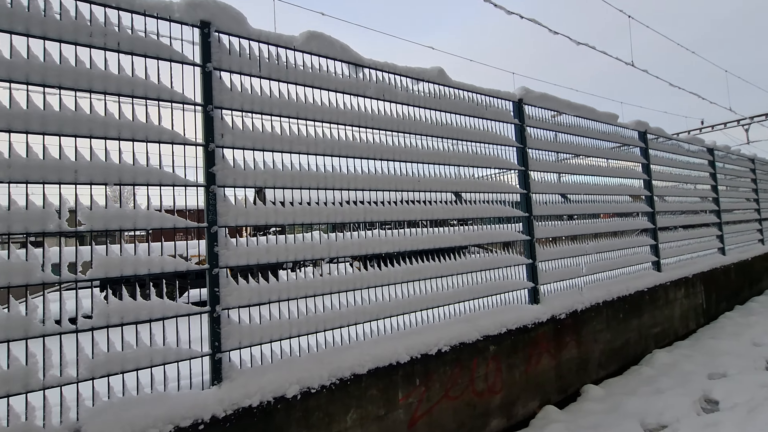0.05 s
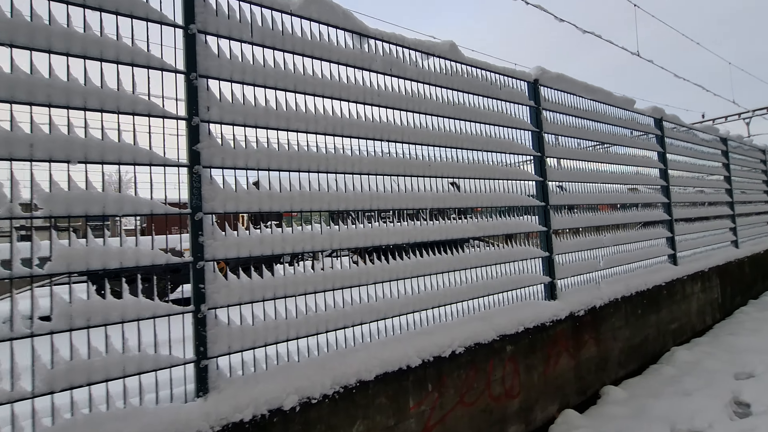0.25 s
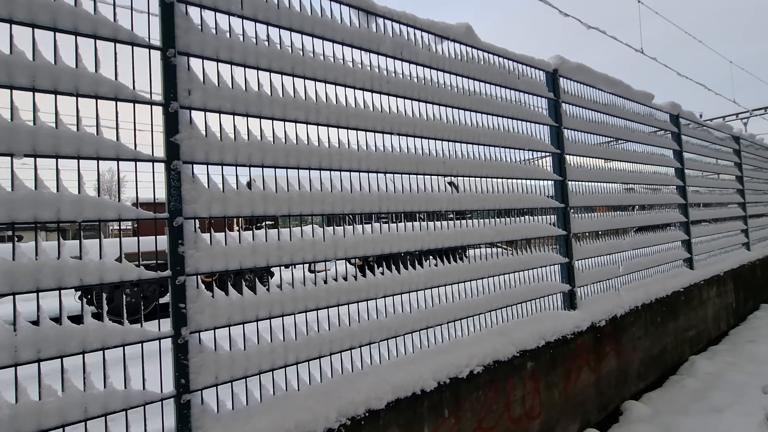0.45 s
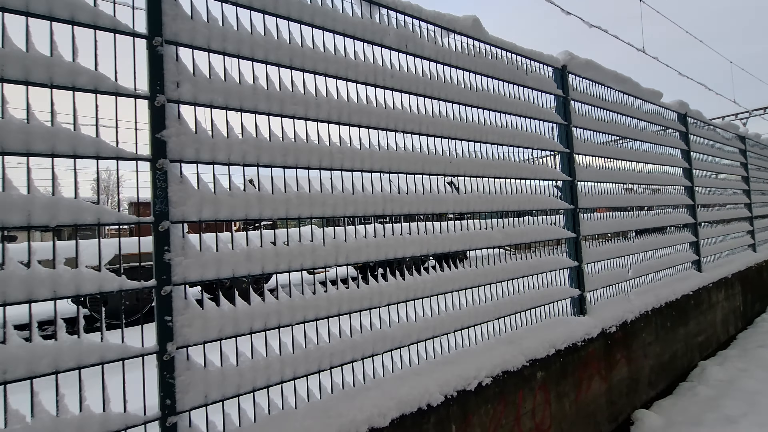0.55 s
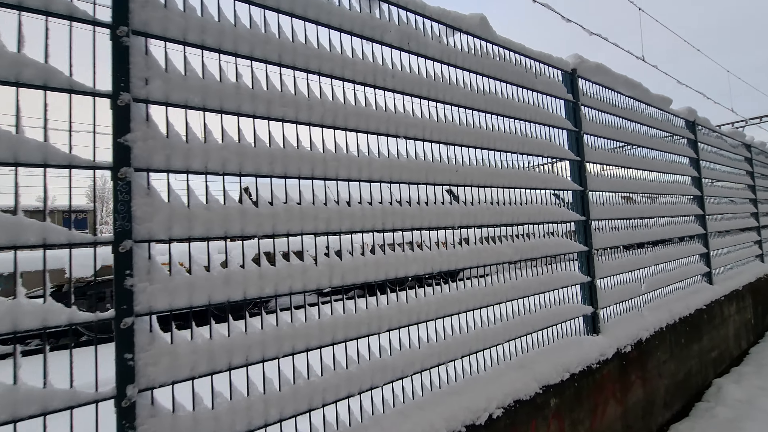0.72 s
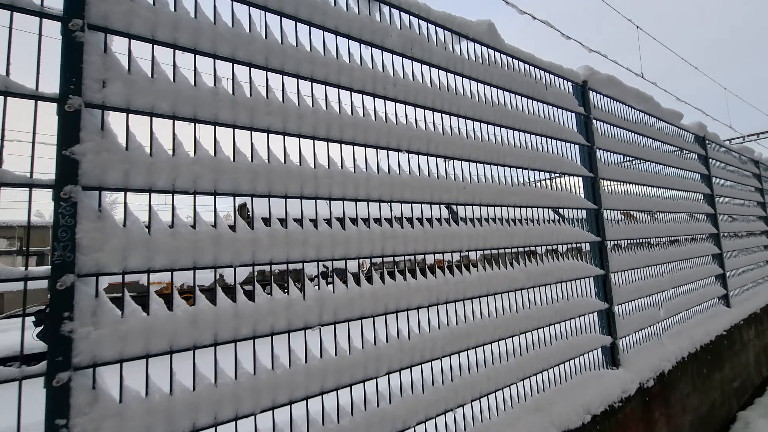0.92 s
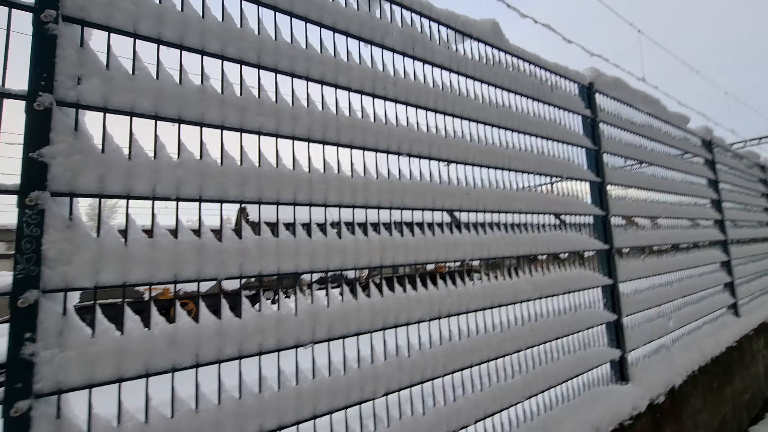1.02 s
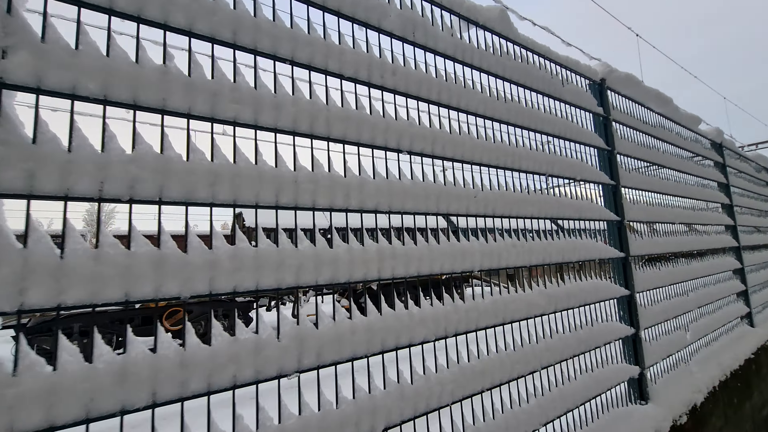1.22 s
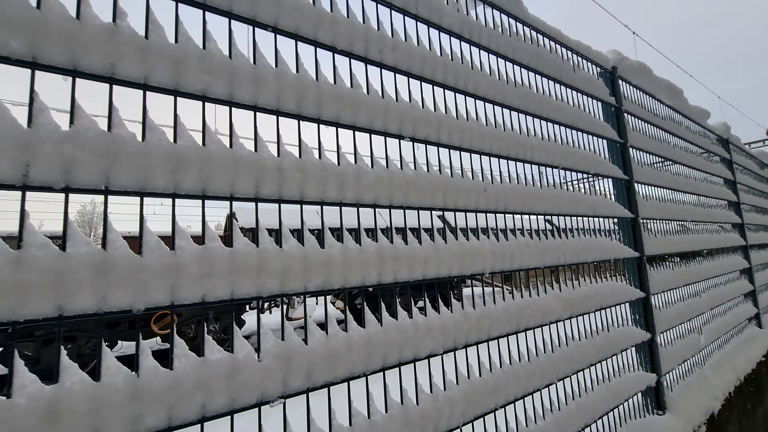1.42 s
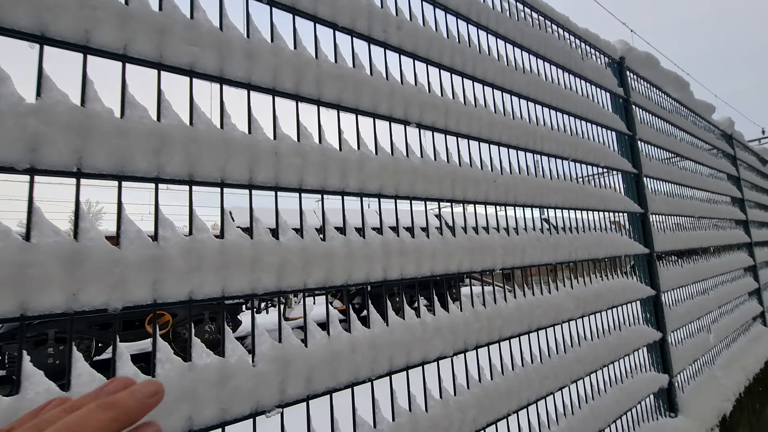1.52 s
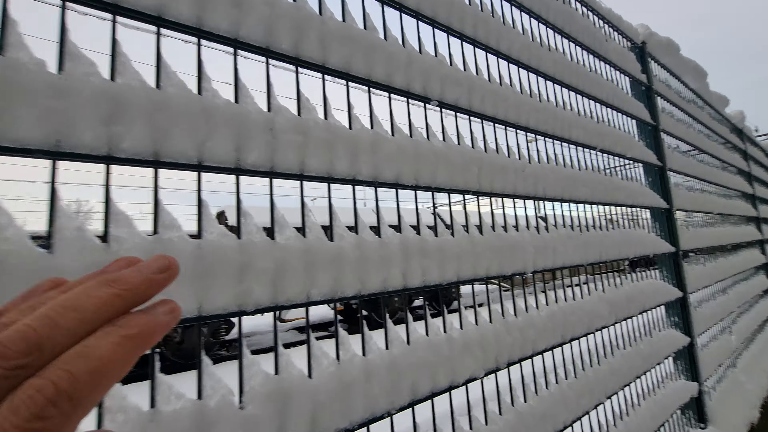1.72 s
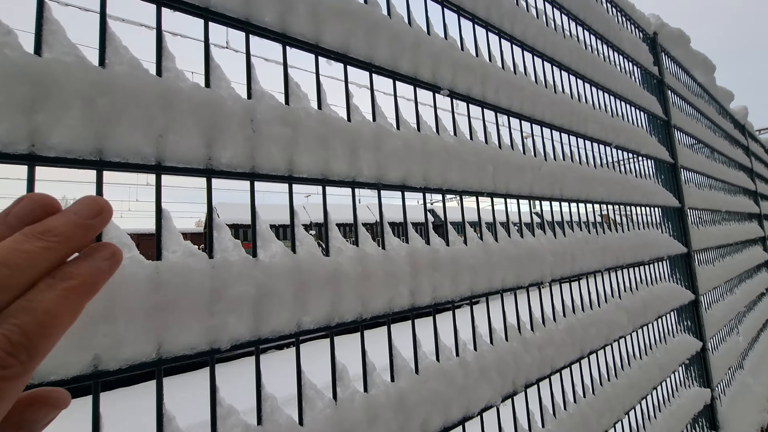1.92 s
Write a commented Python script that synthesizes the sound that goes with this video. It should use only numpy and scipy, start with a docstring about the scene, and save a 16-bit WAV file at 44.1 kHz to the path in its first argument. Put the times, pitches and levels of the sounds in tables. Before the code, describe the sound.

Slow footsteps pack snow in short, dull crunches outdoors beside a fence. First, wind buffets the microphone and a jacket swishes with a sharp double click; the crunches follow, with small dry ticks and faint distant traffic.

```python
"""Slow footsteps in snow beside a fence: it packs under the boots in short, dull crunches.
Close in, wind buffets the two microphone ports, and a jacket swishes, with one sharp
double click, as an arm is raised. Crust and cloth give small dry ticks.
Far behind lie a wash of traffic and a faint hum."""
import sys
import numpy as np
from scipy import signal
from scipy.fft import rfft, irfft
from scipy.io import wavfile
from scipy.ndimage import uniform_filter1d

SR = 44100
rng = np.random.default_rng(int(sys.argv[2]) if len(sys.argv) > 2 else 0)


def output_pcm(signal):
    """Save a mono or channel-first signal as 16-bit PCM at the path in sys.argv[1].

    Samples are clipped to [-1, 1] before scaling.
    """
    pcm = np.clip(np.atleast_2d(signal).T, -1, 1) * 32767
    wavfile.write(sys.argv[1], SR, np.round(pcm).astype(np.int16))


N = 85995
T = np.arange(N) / SR
HZ = np.maximum(np.arange(N // 2 + 1) * SR / N, 1)


def footsteps(snow_q=3.6, grain_s=0.00057):
    """Snow packs underfoot in jerks: each run of slips rings a dull body and sheds grit."""
    # Snow giving way. Each row: start and length in seconds, level in dB, body in Hz, grit in dB re body.
    crunches = [(0.653, 0.011, -51.5, 277, -4), (0.688, 0.015, -49.5, 470, -8),
                (.738, .014, -43.5, 457, -15), (.82, 0.014, -40.5, 209, -39), (.817, 0.011, -42, 442, -16),
                (.868, .014, -56, 387, -9), (0.898, 0.02, -46.5, 210, -18), (.911, .008, -44.5, 527, -8.5),
                (.963, 0.021, -38, 232, -8.5), (1.039, .007, -39, 350, -14), (1.067, 0.013, -42, 215, -10),
                (1.183, .016, -44, 186, -21), (1.321, .012, -48.5, 385, -13), (1.458, 0.011, -54, 600, 16),
                (1.498, 0.011, -47, 380, -13), (1.577, .009, -36.5, 395, -8.5),
                (1.608, .011, -43, 425, -1.5), (1.625, 0.04, -49, 235, 1), (1.683, 0.013, -45, 292, -19)]
    # Spectrum of the grit. Each row: frequency in Hz, gain in dB.
    grit_colour = [(150, -20), (450, 2), (700, 8), (1100, 12), (1600, 0), (2300, -21), (4000, -32),
                   (9000, -43)]
    out = 0
    for at, length, db, hz, grit_db in crunches:
        jerks = slips(at, length)
        body = unit(ring(ring(jerks, hz, snow_q), hz, q=0.59))
        grains = signal.lfilter([1], [1, -np.exp(-1 / (grain_s * SR))], abs(jerks))
        grit = ports(lambda: unit(colour(grains * noise(), grit_colour)))
        out = out + burst_level(body + undb(grit_db) * grit, db, length)
    return out * pan(db=.8)


def slips(start, length, per_s=450, scatter_db=3):
    """An uneven run of tiny collapses in packed snow, one impulse each."""
    count = int(np.clip(length * per_s, 2, 64))
    jitter, strength = rng.standard_normal((64, 2))[:count].T
    signs = rng.choice([-1, 1], 64)[:count]
    times = start + length * (np.arange(count) + .5 + .35 * jitter) / count
    out = np.zeros(N)
    np.add.at(out, np.clip((times * SR).astype(int), 0, N - 1), undb(scatter_db * strength) * signs)
    return out


def wind(wander=.21, flutter_ratio=1.8, flutter_db=-11, sway_hz=48.5, sway_db=-20):
    """Eddies rock the air right at the ports: a few uneven swings, a quicker flutter and a slow sway."""
    # Buffets. Each row: middle and length in seconds, level in dB as if held for a quarter
    # of that length, centre in Hz, left minus right in dB.
    buffets = [(0.107, 0.069, -47, 65, 8), (0.243, 0.054, -35, 71.3, 21), (0.266, 0.082, -36.5, 135, -33),
               (.297, 0.076, -41, 72, -24), (0.338, 0.089, -36, 65.3, 14), (.362, 0.051, -28, 115, -22),
               (0.4, 0.024, -31.5, 89.1, -11), (0.42, 0.033, -21, 112, -36), (0.448, .018, -25, 170, -40),
               (.472, 0.035, -22.5, 87.46, -41), (0.497, 0.048, -31, 115, -18),
               (0.539, 0.048, -37.5, 63.86, 15), (0.606, 0.044, -43, 59.1, 15),
               (0.696, 0.029, -38.5, 64.7, 19.5), (0.779, 0.033, -39, 58, 17), (0.904, 0.052, -39.5, 70, 8),
               (1.098, 0.11, -43.5, 58, -1), (1.495, .07, -51, 58.4, 3), (1.613, 0.046, -41, 80, -7),
               (1.878, 0.025, -42, 55.5, 1)]
    out = 0
    for at, length, db, hz, side_db in buffets:
        swell = np.cos(np.pi * np.clip((T - at) / length, -.5, .5))
        swing_hz = hz * np.exp(wander * drift(rate=327))
        push = unit(np.sin(2 * np.pi * (np.cumsum(swing_hz) / SR + rng.random())))
        flutter = unit(ring_twice(noise(), flutter_ratio * hz, q=1.53))
        sway = unit(ring_twice(noise(), sway_hz, q=1))
        eddy = (push + undb(flutter_db) * flutter + undb(sway_db) * sway) * swell
        out = out + burst_level(eddy, db, length / 4) * pan(side_db)
    return out


def jacket(grain_db=.75, right_db=1):
    """Sliding cloth gives a grainy hiss, brighter on the left, and one rub close to the microphone."""
    # Course of the swishes and of the rub. Each row: time in seconds, level in dB.
    swish_level = [(0, -57), (.06, -84), (.085, -58), (.145, -56), (.18, -59.5), (.28, -56), (.385, -54.5),
                   (.44, -61), (.58, -65.5), (.7, -54), (.8, -58.5), (.96, -57), (1.04, -56), (1.11, -64.5),
                   (1.2, -58.5), (1.3, -53), (1.52, -53), (1.62, -57), (1.78, -64), (1.82, -60),
                   (1.95, -73)]
    rub_level = [(.2, -68), (.28, -41), (.32, -46.5), (.385, -37.5), (.41, -45.5), (.44, -47), (.5, -87)]
    # Spectra of the swish on each side and of the rub. Each row: frequency in Hz, gain in dB.
    left_colour = [(400, 12), (1200, -3.5), (2400, 8.5), (4500, -1), (6500, -2.5), (9000, 0), (13000, 0.5),
                   (16000, -7)]
    right_colour = [(400, -2), (1400, 1.5), (2400, -12.5), (3300, -15.5), (4500, -14), (6500, -20.5),
                    (10000, -20), (12500, -14), (16000, -21)]
    rub_colour = [(200, 26), (600, 11), (1100, 9), (1700, 10.5), (2600, 1), (4500, -2.5), (8000, -9.5),
                  (16000, -29)]
    grain = undb(grain_db * drift(rate=120))
    left, right = ports(lambda: noise() * grain)
    swish = np.array([unit(colour(left, left_colour)), undb(right_db) * unit(colour(right, right_colour))])
    rub = ports(lambda: unit(colour(noise() * grain, rub_colour)))
    return swish * curve(swish_level) + rub * curve(rub_level)


def clicks(crack_db=3):
    """Hard contacts close by, perhaps jacket fittings: each a sharp crack, then a short scatter."""
    # Contacts, the loudest two a double click. Each row: start in seconds, level in dB, decay in seconds.
    contacts = [(0.025, -60, 0.0032), (0.137, -59, 0.0058), (.207, -56, .002), (.588, -56, 0.0014),
                (.393, -34, .0008), (0.394, -28.5, .0008), (0.395, -48, 0.011)]
    # Their bright spectrum. Each row: frequency in Hz, gain in dB.
    click_colour = [(800, -23), (1600, 7.5), (2600, -24), (4700, -8), (5250, 2), (6000, -9), (6900, -0.5),
                    (8000, -3), (9500, -5), (10500, -15.5), (16000, -11.5)]
    out = 0
    for at, db, decay in contacts:
        impulse = np.diff((T >= at).astype(float), prepend=0)
        crack = unit(stereo(impulse, np.zeros(N)))
        scatter = ports(lambda: unit(noise() * fade(at, decay)))
        contact = scatter + undb(crack_db) * np.exp(-decay / .005) * crack  # long ones mostly rustle
        out = out + burst_level(colour(contact, click_colour), db, decay)
    return out * pan(db=-5)


def ticks():
    """Crust and cloth tick faintly nearby: dry, fast-dying bursts of midrange noise."""
    # Ticks. Each row: start in seconds, level in dB, centre in Hz, decay in seconds.
    bursts = [(.076, -52, 1360, 0.012), (0.136, -47, 1370, 0.0048), (0.589, -52, 1410, 0.0018),
              (.966, -46.5, 1130, 0.0037), (0.975, -52, 1580, 0.0026), (1.0015, -42.5, 1600, 0.00042),
              (1.076, -49.5, 1120, 0.0009), (1.238, -50, 1290, 0.0013), (1.274, -45, 2390, 0.0013),
              (1.578, -48.5, 1110, 0.0024), (1.683, -45, 920, .007)]
    out = 0
    for at, db, hz, decay in bursts:
        tick = ports(lambda: ring_twice(noise() * fade(at, decay), hz, q=1.7))
        out = out + burst_level(tick, db, 2 * decay)
    return out * pan(db=1.5)


def draught():
    """Air moving over the ports keeps up a soft, low rumble between the buffets."""
    # Strength of the draught. Each row: time in seconds, level in dB.
    level = [(0, -77), (.2, -52), (.3, -45), (.7, -58.5), (1.1, -51.5), (1.4, -52.5), (1.65, -54),
             (1.75, -60), (1.95, -54)]
    return ports(lambda: unit(ring_twice(noise(), hz=58.2, q=1.55))) * curve(level)


def traffic(flicker_db=1.15):
    """Distant traffic blurs into a wash whose octaves flicker on their own."""
    # Spectrum of traffic and open air. Each row: frequency in Hz, gain in dB.
    wash_colour = [(20, -35), (35, -39), (55, -6), (90, 2), (140, -5), (220, -1.5), (310, -6.5), (440, -4),
                   (600, -7), (850, -14.5), (1400, -17), (2200, -24), (3200, -28.5), (4600, -28),
                   (6200, -37), (10000, -40.5), (13000, -43.5), (16000, -36)]
    # Swell of the wash. Each row: time in seconds, level in dB.
    level = [(0, -47.5), (.15, -50.5), (.55, -47.5), (.9, -46), (1.15, -48), (1.4, -47.5), (1.65, -44),
             (1.8, -48), (1.95, -48)]
    spectrum = rfft(ports(lambda: unit(colour(noise(), wash_colour))))
    out = 0
    for octave in range(15):
        band = np.maximum(1 - abs(np.log2(HZ) - octave), 0)
        out = out + irfft(spectrum * band, N) * undb(flicker_db * drift(rate=26))
    return out * curve(level)


def hum(hz=533, wander=.007):
    """One faint, wavering tone far back in the centre."""
    # Rise and fall of the hum. Each row: time in seconds, level in dB.
    level = [(0, -48), (.1, -64), (.22, -54), (.45, -60.5), (.8, -65.5), (1.1, -56), (1.35, -63),
             (1.6, -71), (1.95, -64.5)]
    pitch = hz * (1 + wander * drift(rate=22))
    tone = np.sin(2 * np.pi * np.cumsum(pitch) / SR)
    return unit(tone * undb(2 * drift(rate=3))) * curve(level)


def stereo(a, b, lag_s=0.000467, lag_from_hz=1100):
    """Mid a and side b at the ports: most alike in the bass, the treble later on the left."""
    # Likeness of the two ports. Each row: frequency in Hz, correlation.
    likeness = [(40, 0.21), (130, 1), (300, 0.65), (480, 0.48), (700, 0.05), (1400, 0.12), (3000, 0.34),
                (7000, 0.085), (15000, 0.12)]
    correlation = np.clip(over_hz(likeness), 0, .99)
    mid = rfft(a) * np.sqrt((1 + correlation) / 2)
    side = rfft(b) * np.sqrt((1 - correlation) / 2)
    delay = np.exp(-2j * np.pi * HZ * lag_s * (HZ > lag_from_hz))
    return irfft(np.array([(mid + side) * delay, mid - side]), N)


def ports(source):
    """Two draws of a noisy source, spread over the microphone ports."""
    return stereo(source(), source())


def pan(db):
    """Left and right gains for left minus right in dB."""
    return unit(undb(np.array([[db], [-db]]) / 2))


def undb(db):
    """Decibels to gain."""
    return 10 ** (np.asarray(db) / 20)


def unit(x):
    """Scale to rms 1."""
    return x / np.sqrt(np.mean(x ** 2) + 1e-20)


def burst_level(x, db, length):
    """Scale a short sound to the energy of db held for length seconds."""
    return unit(x) * undb(db) * np.sqrt(length * SR / N)


def curve(rows):
    """Gain over time from (s, dB) points."""
    return undb(np.interp(T, *np.array(rows).T))


def over_hz(rows):
    """Join (Hz, value) points on a log-frequency axis."""
    hz, value = np.array(rows).T
    return np.interp(np.log(HZ), np.log(hz), value)


def colour(x, rows):
    """Filter by (Hz, dB) points."""
    return irfft(rfft(x) * undb(over_hz(rows)), N)


def ring(x, hz, q):
    """One damped resonance."""
    return irfft(rfft(x) / (1 + 1j * q * (HZ / hz - hz / HZ)), N)


def ring_twice(x, hz, q):
    """Two equal resonances in series, for steeper skirts."""
    return ring(ring(x, hz, q), hz, q)


def noise():
    """White noise."""
    return rng.standard_normal(N)


def drift(rate):
    """Smooth random motion, about rate turns a second, rms 1."""
    width = max(int(SR / rate), 1)
    smoothed = uniform_filter1d(noise(), width, mode="wrap")
    return unit(uniform_filter1d(smoothed, width, mode="wrap"))


def fade(start, decay):
    """Instant attack, exponential release."""
    return (T >= start) * np.exp(-np.maximum(T - start, 0) / decay)


def scene():
    """The distance, the wind and the walker, summed at the microphone."""
    return traffic() + hum() + draught() + wind() + footsteps() + ticks() + clicks() + jacket()


def record(dry):
    """The recorder cuts the top steeply."""
    top_hz = 15900
    return signal.sosfilt(signal.ellip(10, .1, 80, top_hz, fs=SR, output="sos"), dry)


dry = scene()
out = record(dry)
output_pcm(out)
```